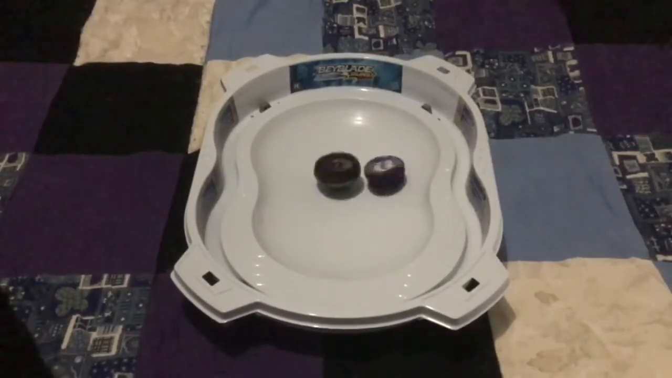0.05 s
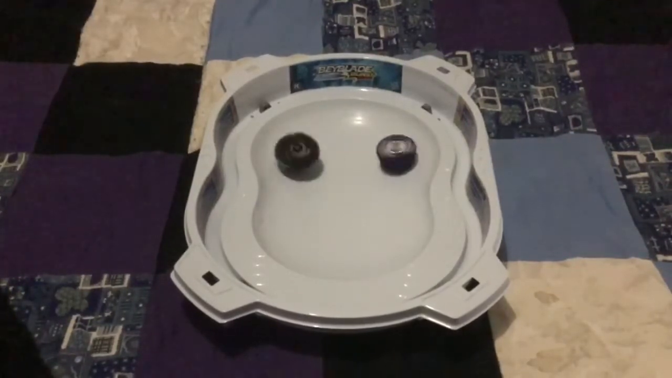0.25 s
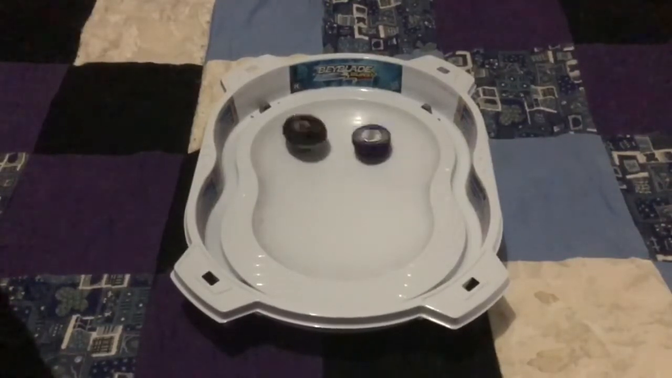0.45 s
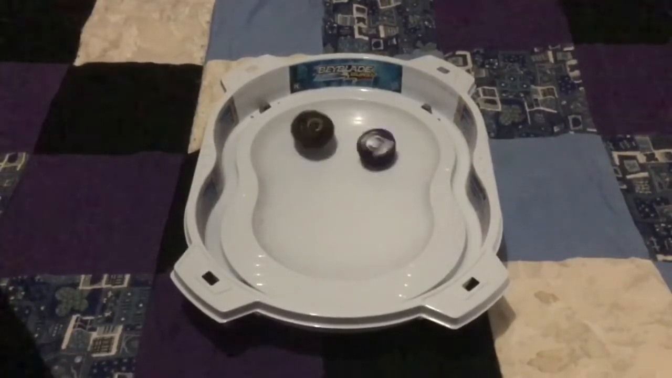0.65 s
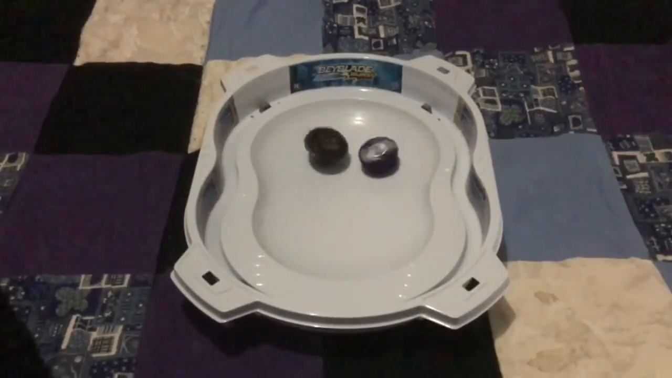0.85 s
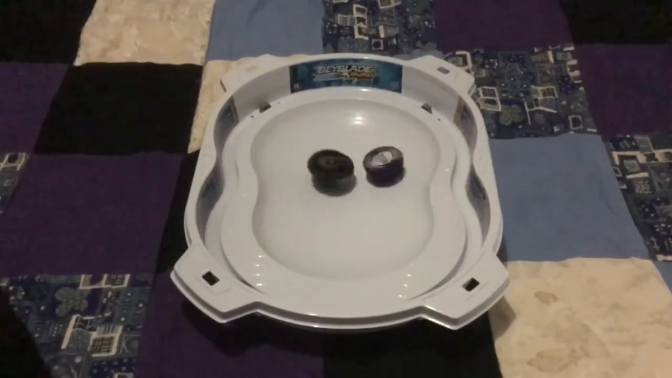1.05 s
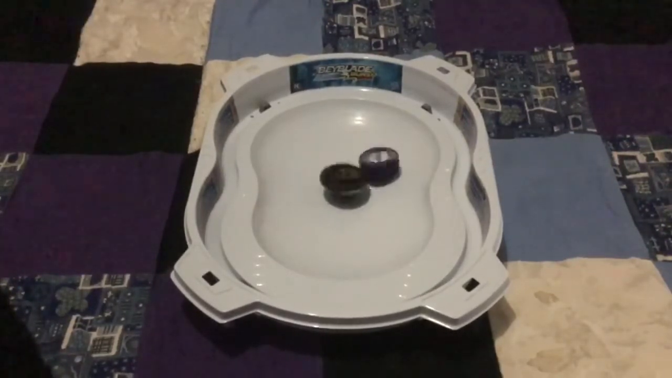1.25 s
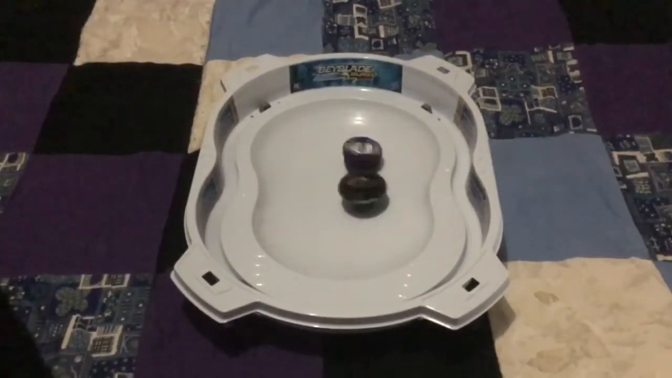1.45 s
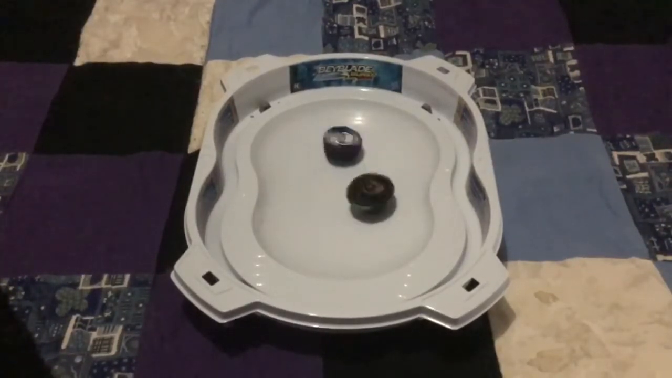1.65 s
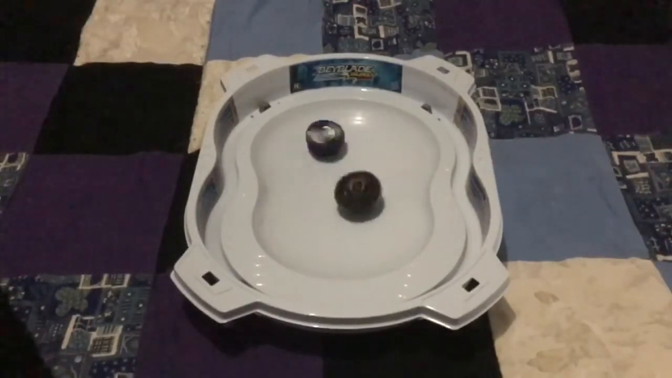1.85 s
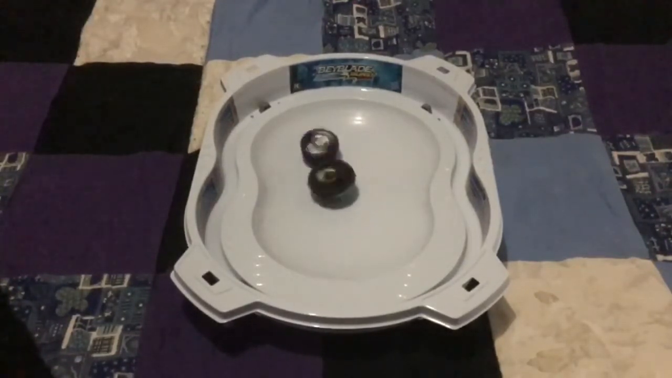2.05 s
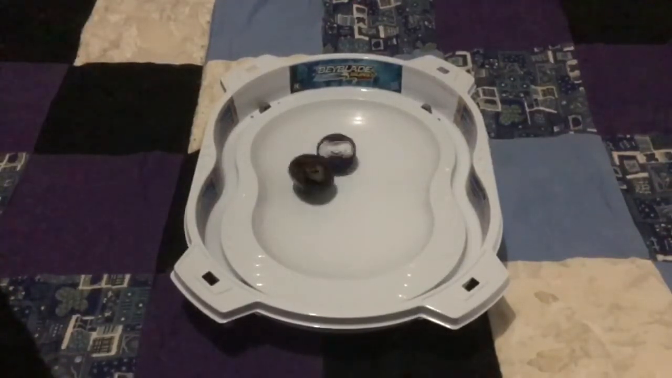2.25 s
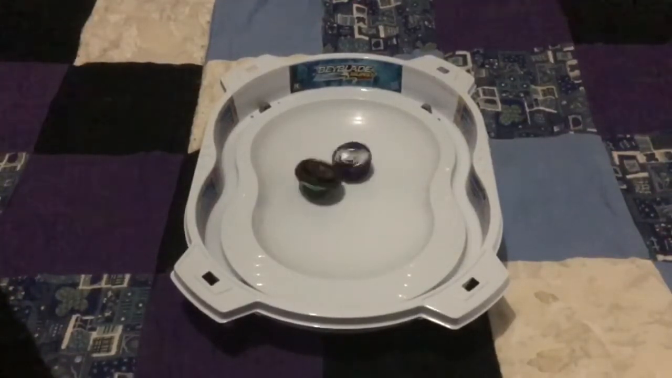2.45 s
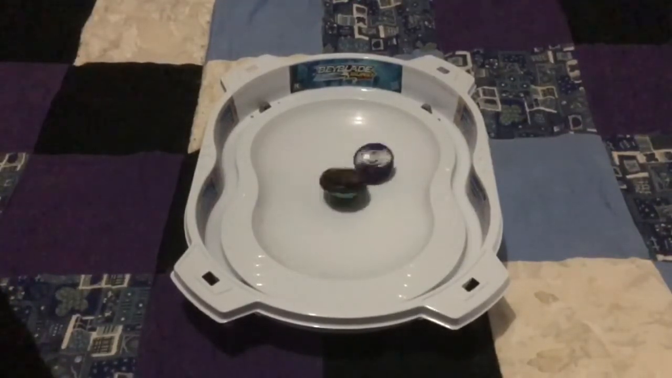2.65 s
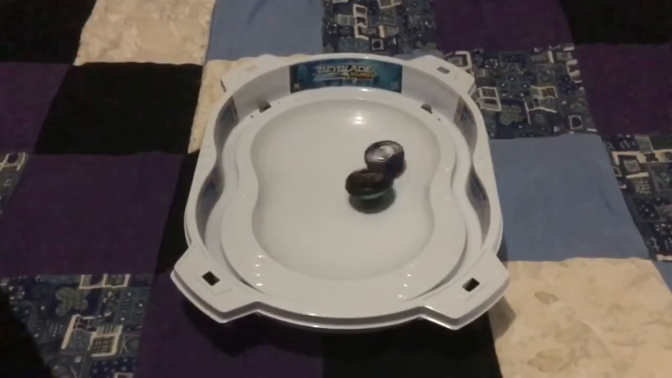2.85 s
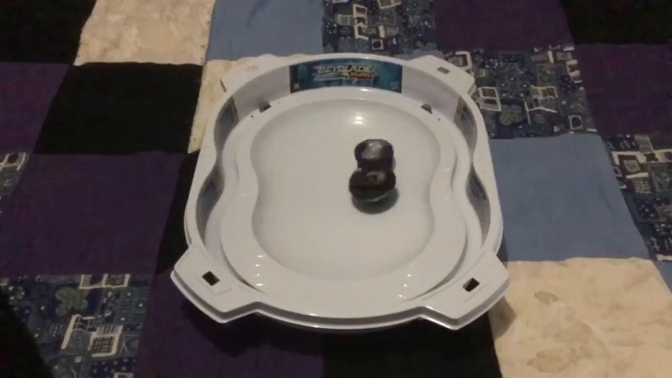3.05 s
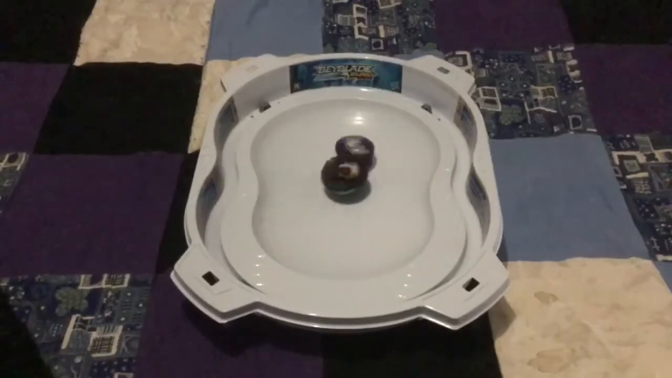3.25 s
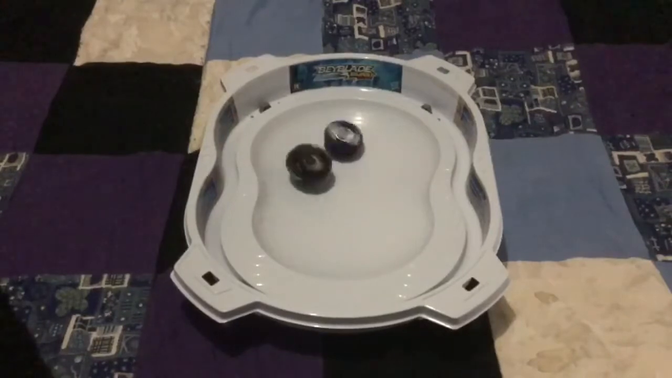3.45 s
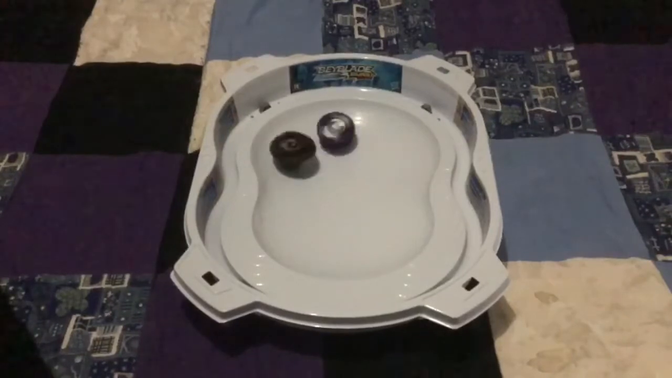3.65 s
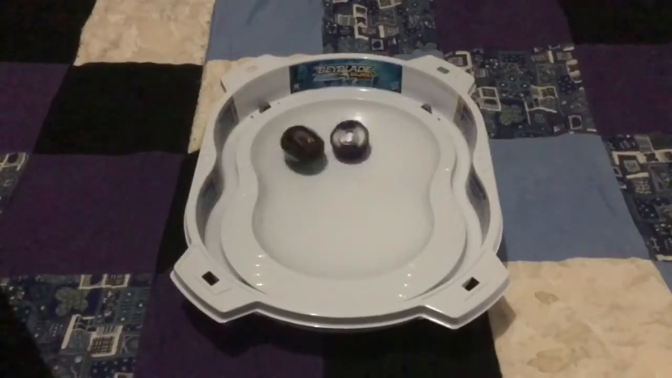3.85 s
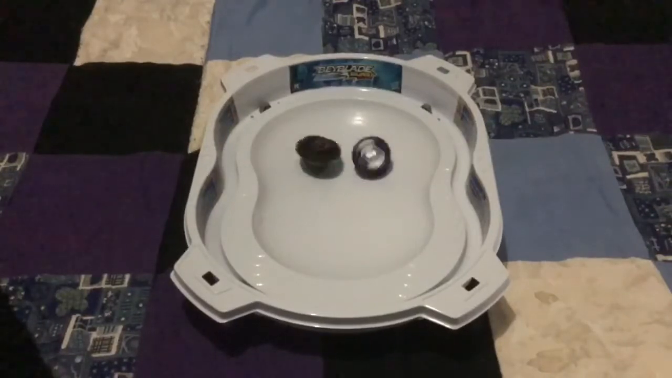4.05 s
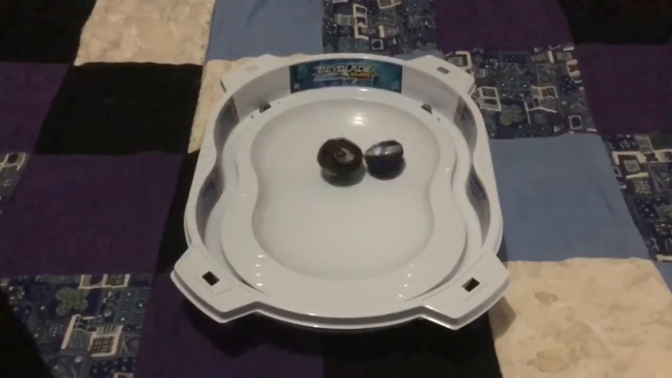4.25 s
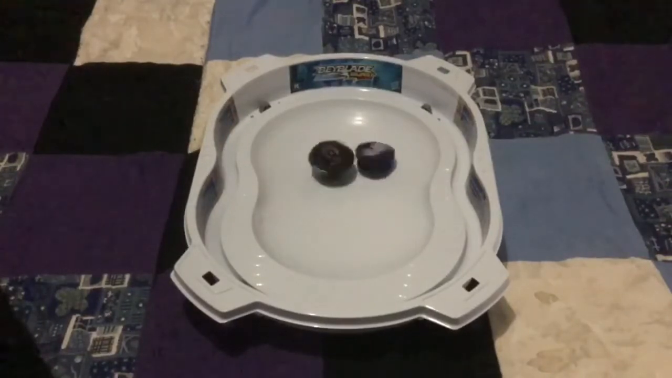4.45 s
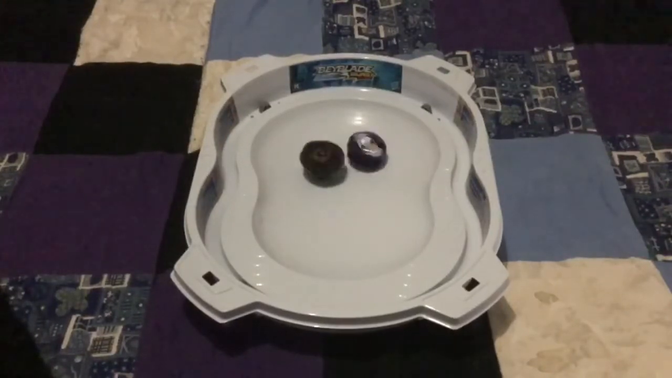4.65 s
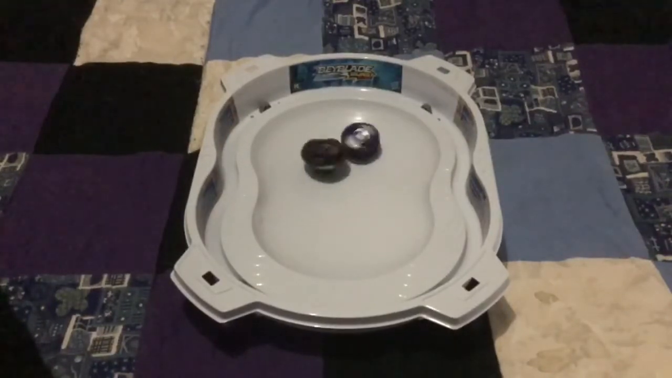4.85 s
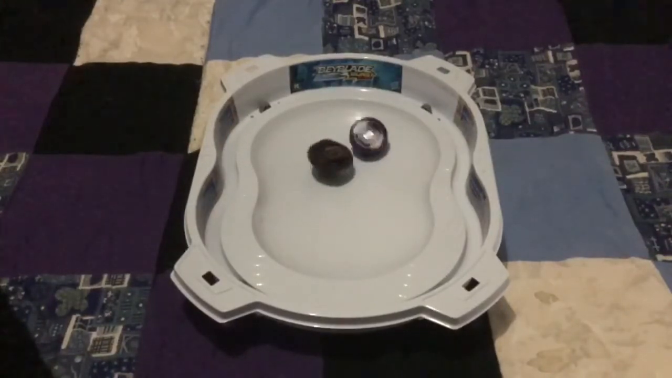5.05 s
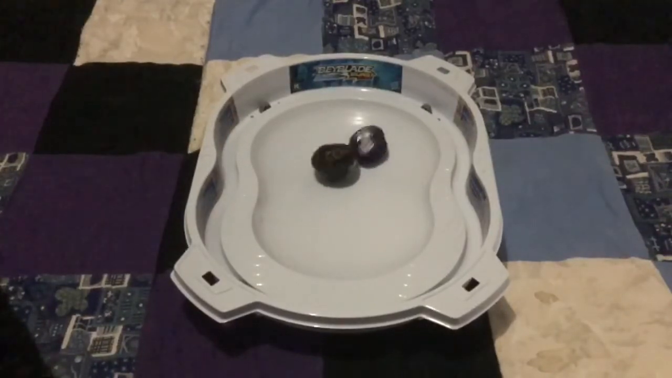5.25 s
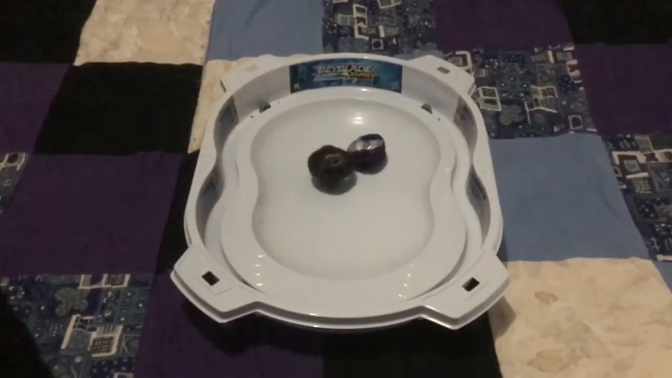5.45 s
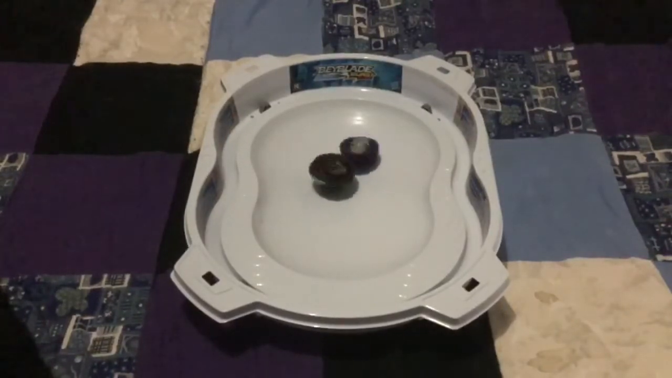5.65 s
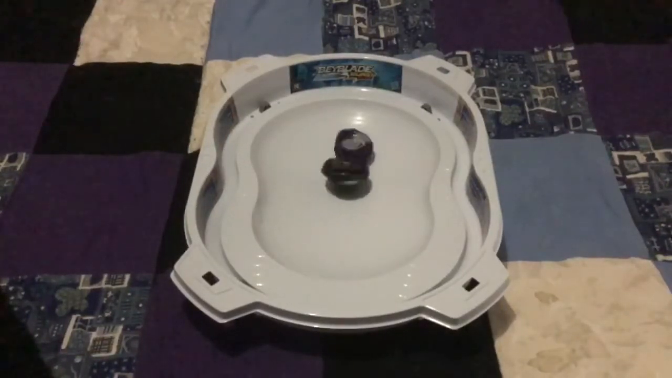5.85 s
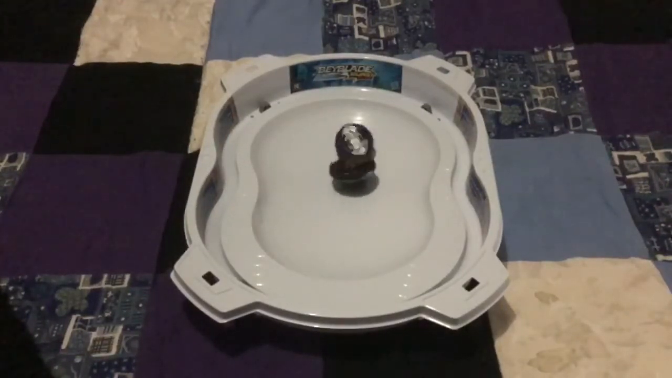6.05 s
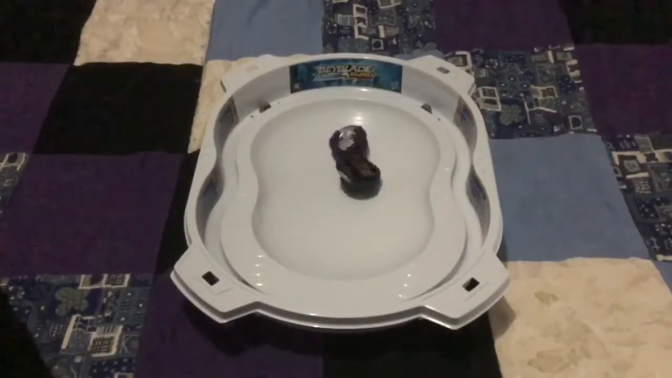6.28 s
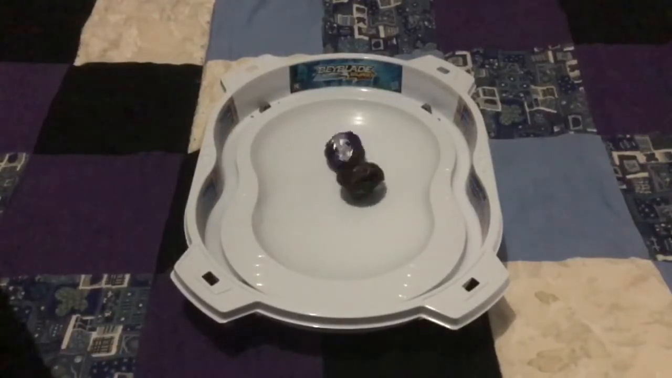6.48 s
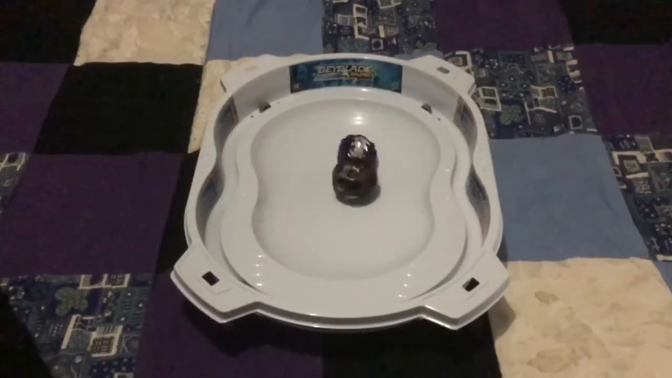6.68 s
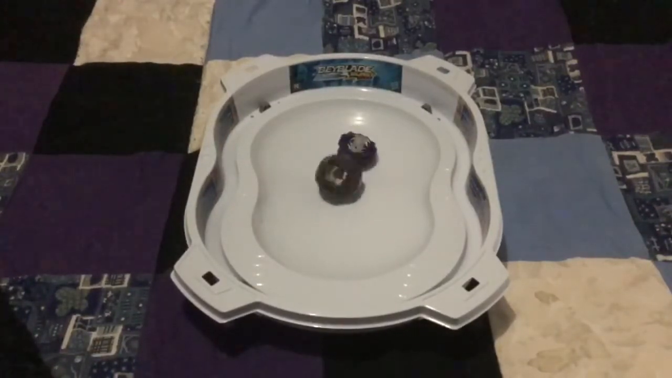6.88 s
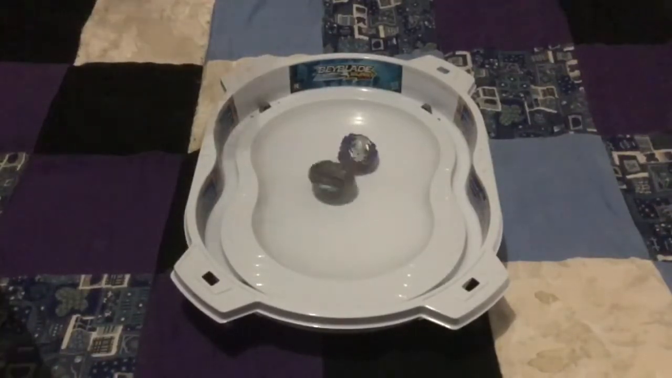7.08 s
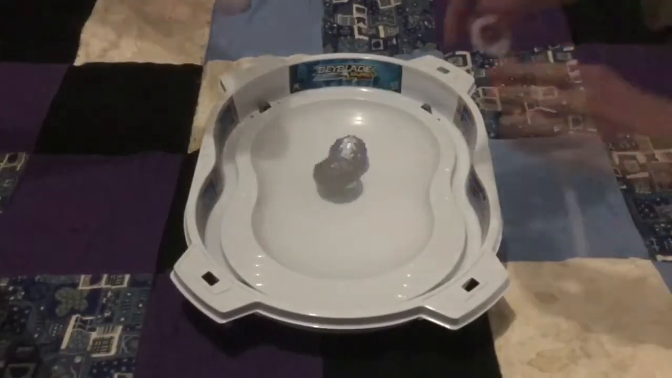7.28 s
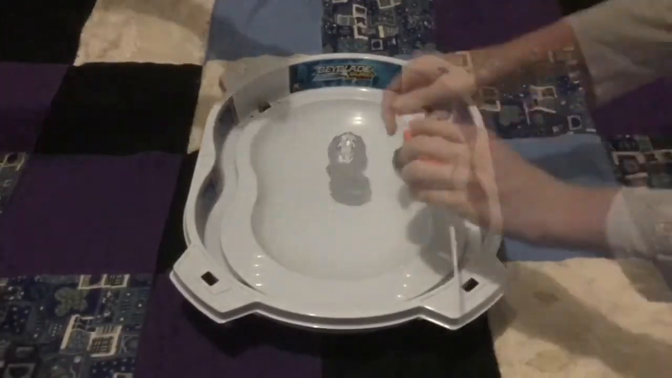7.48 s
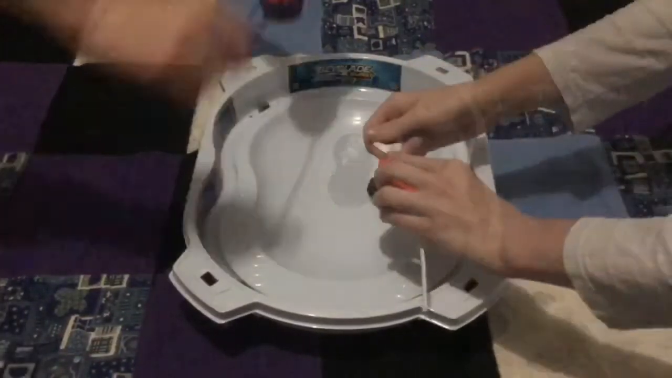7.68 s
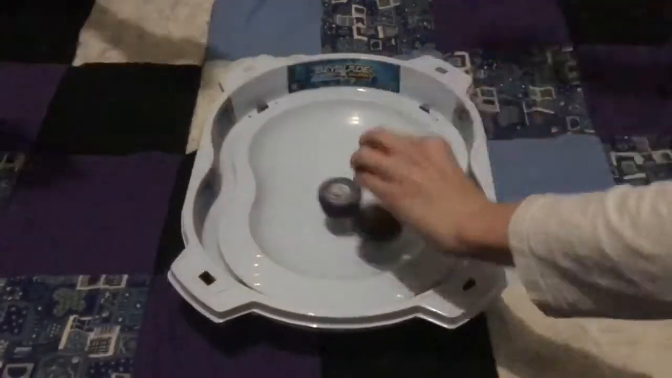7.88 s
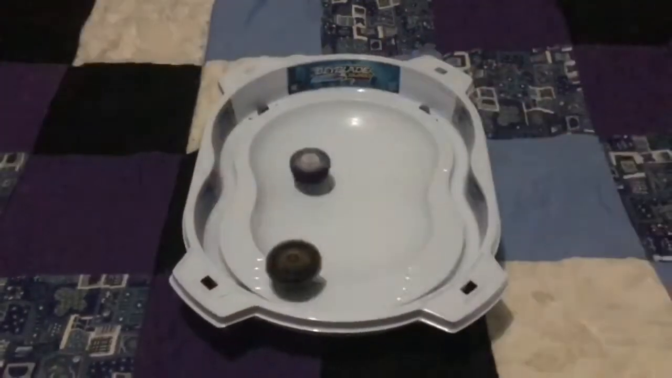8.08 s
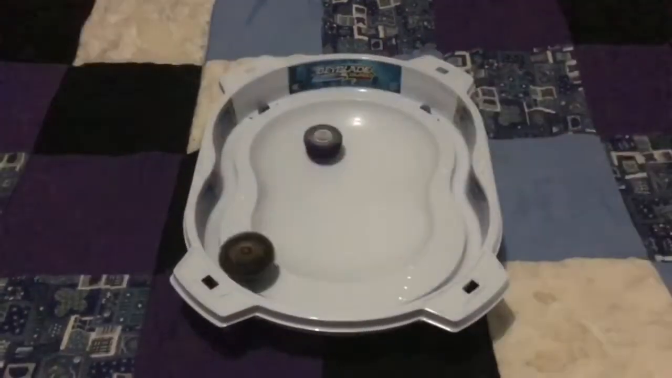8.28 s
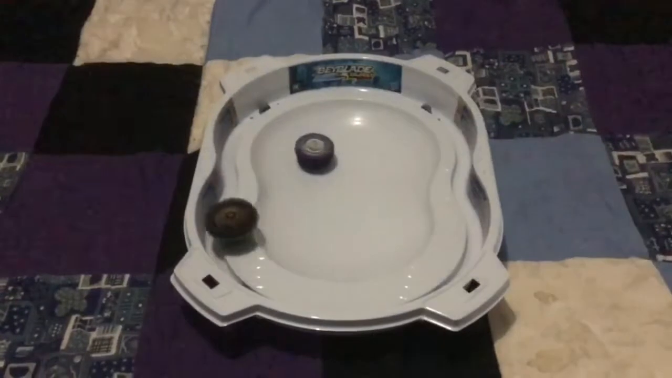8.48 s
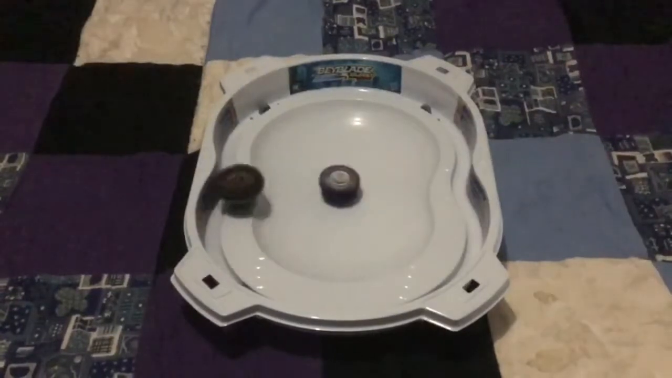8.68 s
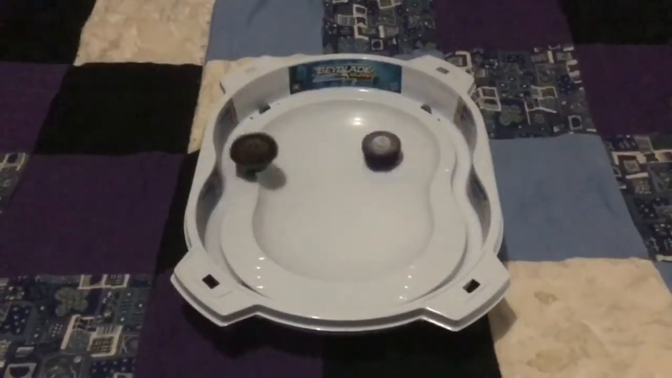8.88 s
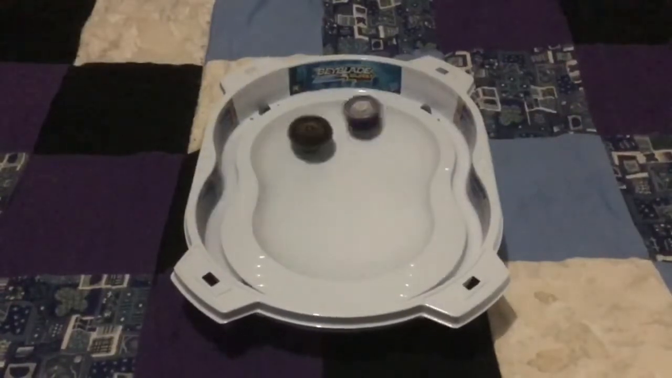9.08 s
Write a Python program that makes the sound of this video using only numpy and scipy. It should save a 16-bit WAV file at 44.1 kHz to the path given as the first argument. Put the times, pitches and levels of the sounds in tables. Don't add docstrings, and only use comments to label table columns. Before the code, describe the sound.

A phone close to a plastic arena picks up spinning tops tapping and brushing rims, their tips rumbling softly beneath a pure low hum. Clicks cluster midway, then thin out. Suddenly two quick ratchet-like cord pulls with squeaking gears release new tops, which bang onto the hollow floor, knock the side wall and end in rough, biting rim scrapes. Short, dry room echo and faint hiss.

```python
import sys
import numpy as np
from scipy import signal
from scipy.fft import rfft, irfft, next_fast_len
from scipy.io import wavfile
from scipy.ndimage import uniform_filter1d, map_coordinates

SR = 44100
rng = np.random.default_rng(int(sys.argv[2]) if len(sys.argv) > 2 else 0)


def makeup_ratio(level_db):
    decades = np.asarray(level_db, float) / 20
    return 10 ** decades


def output_pcm(signal):
    pcm = np.clip(np.atleast_2d(signal).T, -1, 1) * 32767
    wavfile.write(sys.argv[1], SR, np.round(pcm).astype(np.int16))


N = 402191
TIME = np.arange(N) / SR

# pitch_hz, width_hz, level_db
FLOOR_MODES = [(102.8, 17, -0.5), (171.3, 48.4, 3), (215.5, 106.4, -0.5), (296.7, 90, -0.5),
               (423.2, 78, -3.5), (500.4, 110, -5), (637.7, 59, -4.5)]
# pitch_hz, level_db (per Hz)
EDGE_COLOUR = [(4000, -36), (7000, -3), (9000, -3.5), (13000, -5.5), (15500, -4), (17000, -23)]
# pitch_hz, level_db (per Hz)
BRUSH_COLOUR = [(600, -21.5), (1200, -0.5), (2000, 1.5), (3200, -4), (4800, -5.5), (6000, -12), (9000, -23),
                (15000, -28.5)]


def unit(x):
    return x / np.sqrt(np.mean(x ** 2) + 1e-20)


def along(points, hz):
    point_hz, value = np.transpose(points)
    return np.interp(np.log(hz + 1), np.log(point_hz + 1), value)


def level_curve(rows):
    s, db = np.transpose(rows)
    return np.interp(TIME, s, db)


def gated(rows, db):
    since_start = TIME - rows[0][0]
    until_end = rows[-1][0] + 0.022 - TIME
    return makeup_ratio(db) * np.clip(np.minimum(since_start, until_end) / 0.044, 0, 1)


def wobble(rate):
    return map_coordinates(rng.standard_normal(int(N * rate / SR) + 4), [TIME * rate])


def filtered(x, response):
    m = next_fast_len(N + SR // 2)
    return irfft(rfft(x, m) * response(np.fft.rfftfreq(m, 1 / SR)), m)[..., :N]


def coloured(x, spectrum):
    return filtered(x, lambda hz: makeup_ratio(along(spectrum, hz)))


def ringing(x, modes, sign=-1):
    def response(hz):
        total = 0
        for k, (centre, width, db) in enumerate(modes):
            loss = 1j * hz * width
            total = total + sign ** k * makeup_ratio(db) * loss / (centre * centre - hz * hz + loss)
        return total
    return filtered(x, response)


def dying(times, dbs, t60):
    start = np.bincount(np.round(times * SR).astype(int), makeup_ratio(2 * dbs), N)[:N]
    return np.sqrt(signal.lfilter([1], [1, -makeup_ratio(-120 / (t60 * SR))], start))


def pressed_on(rows, rise, fall):
    levels = []
    for s, hold, db in rows:
        before = np.maximum(s - TIME, 0)
        after = np.maximum(TIME - s - hold, 0)
        levels.append(db - rise * before - fall * after)
    return np.max(levels, axis=0)


def grains(rate, spread_db):
    size = makeup_ratio(spread_db * np.clip(rng.standard_normal(N), -2, 2))
    return (rng.random(N) < rate / SR) * size * rng.choice([-1, 1], N)


def rattle(rate, depth):
    skips = signal.lfilter([1], [1, -makeup_ratio(-60 / (.012 * SR))], np.abs(grains(rate, spread_db=4)))
    return unit(1 + depth * unit(skips))


def patchy(depth_db):
    z = signal.stft(rng.standard_normal(N), nperseg=256)[2]
    field = uniform_filter1d(rng.standard_normal(z.shape), size=6, axis=0)
    field = uniform_filter1d(field, size=5, axis=1)
    return unit(signal.istft(z * makeup_ratio(depth_db * unit(field)), nperseg=256)[1][:N])


def brief_notes(rows, t60, rough, slips):
    out = np.zeros(N + SR)
    slip = rough * wobble(slips)
    flutter = makeup_ratio(3 * wobble(300))
    for s, hz, hold, db in rows:
        start = round(s * SR)
        a = slice(start, start + SR // 16)
        t = TIME[a] - s
        fade_in = np.clip(t / .0012, 0, 1)
        shape = makeup_ratio(db - 60 * np.maximum(t - hold, 0) / t60) * fade_in
        out[a][:len(t)] += shape * flutter[a] * np.sin(2 * np.pi * hz * t + slip[a])
    return out[:N]


def hits(rows, click_db, edge_db, chatter_db, shell_db, thump_db):
    # pitch_hz, level_db (per Hz)
    click_colour = [(600, -46.5), (1200, -6.5), (2000, -12), (3600, -1.5), (5600, -1.5), (7000, -15.5),
                    (9000, -39), (16000, -44)]
    # pitch_hz, width_hz, level_db
    shell_modes = [(982, 73, -13), (1140, 49, -3.5), (1234, 170, -9.5), (1855, 120, -5.5), (2423, 380, -11),
                   (3160, 670, -11.5), (4170, 77, -20)]
    s, db, bright, knock, thump = np.transpose(rows)
    noise = patchy(depth_db=1.4)
    loose = rattle(300, 1.2)

    def snap(level, t60, size):
        jump = uniform_filter1d(dying(s, level, t60), size=size)
        return jump + dying(s, level + chatter_db, 0.065) * loose

    click = coloured(snap(db + click_db, 0.014, size=36) * noise, click_colour)
    edge = coloured(snap(db + bright + edge_db, 0.015, size=12) * noise, EDGE_COLOUR)
    shell = ringing(dying(s, db + knock + shell_db, 0.019) * noise, shell_modes)
    floor_db = db + thump + thump_db
    push = dying(s + 0.001513, floor_db, 0.0018)
    shake = 1.92 * dying(s, floor_db, 0.043) * noise
    floor = ringing(push, FLOOR_MODES, sign=0.78) + ringing(shake, FLOOR_MODES)
    return click + edge + shell + floor


def clashes():
    # start_s, level_db (click peak), brightness_db, floor_thump_db (both beside the click)
    clean = [(.478, -13, -8.5, -21), (0.8839, -19.5, -6, -15), (1.2503, -26.5, -12, -15.5),
             (2.08, -23.5, -11.5, -10), (2.0925, -17.5, -9.5, -10.5), (2.4502, -23.5, -10, -14.5),
             (2.525, -25.5, -9, -16), (3.2219, -30, -15, -15.5), (3.276, -23, -15.5, -15),
             (3.697, -23.5, -10, -10.5), (3.8726, -39, -12, 5.5), (4.113, -40, -3, -13),
             (4.1801, -22, -8.5, -11), (4.3783, -38.5, -15.5, -5), (4.4283, -25.5, -14, -19),
             (4.8322, -30.5, -15, -15), (4.8635, -30, -6.5, -12), (4.927, -21.5, -12, -18.5),
             (5.204, -22, -11, -13.5), (5.302, -25, -10, -20), (5.409, -26, -10, -33),
             (5.6872, -25, -10.5, -14), (5.8485, -28, -10.5, -19), (6.115, -27.5, -11, -7),
             (6.145, -26.5, -11, -19)]
    bumps = [(0.024, -17.5, -4.5, -17), (0.474, -22.5, -1, -12), (2.07, -31, -11, -6),
             (2.125, -22, -13, -11.5), (2.428, -32, -9, -19), (3.7086, -30.5, -6, -8),
             (3.7553, -19.5, -5.5, -11.5), (3.8465, -30, -20, -4.5), (3.897, -43, -15, 0),
             (3.915, -39, -13, 1), (3.984, -43, -21, 6), (4.077, -43, -18, 3), (4.0155, -37, -11, -1),
             (4.046, -40, -16, 4.5), (4.1377, -32.5, -7, -6), (4.1582, -35, -1, -5.5),
             (4.177, -27.5, -2, -14), (4.186, -29, -14, -19), (4.408, -41.5, -16, 2),
             (4.4981, -27, -9, -12), (5.1129, -41, -23.5, -2), (5.1791, -46, -21, 8),
             (5.291, -39, -12, 2.5), (5.337, -38, -28, -7), (5.375, -24, -12, -5), (5.755, -40, -23, 1.5),
             (6.1611, -27, -20, -12.5), (6.762, -34, -12, -10.5), (7.2446, -30.5, -17, -13),
             (7.3564, -32.5, -15, -15.5)]
    # start_s, level_db (click peak), floor_thump_db (beside the click)
    knocks = [(3.323, -35.5, -7.5), (3.8233, -31.5, -4.5), (3.9406, -30, -4), (4.4672, -34.5, 3),
              (4.972, -38, 1.5), (5.038, -41.5, 5), (5.1483, -40, 2), (5.627, -43, 8), (5.658, -37.5, -2.5),
              (5.71, -32.5, -2.5), (5.8662, -33.5, -6.5), (5.908, -39, -7), (6.735, -40.5, -9),
              (7.169, -36.5, -10), ]
    rows = [(s, db, bright, -38, thump) for s, db, bright, thump in clean]
    rows += [(s, db, bright, -7.5, thump) for s, db, bright, thump in bumps]
    rows += [(s, db, -15.5, -1, thump) for s, db, thump in knocks]
    return hits(rows, click_db=0.5, edge_db=5.0, chatter_db=-4.5, shell_db=17.5, thump_db=17.0)


def blows():
    # start_s, level_db (click peak), brightness_db, shell_knock_db, floor_thump_db
    blow_rows = [(7.6595, -13, 8, -42, -14.5), (7.7728, -40, -9.5, -17, -15),
                 (7.7861, -11.5, -15, -12.5, -4), (7.864, 1, -4.5, -47, -15.5), (7.9268, -21, -10, 2, -16),
                 (8.0052, -16.5, -12.5, -19, -6), (8.0273, -34, -26, 7.5, 11.5),
                 (8.1038, -30, -7, -9.5, 1.5), (8.1427, -32, -17, -8, 0), (8.1884, -27, -14, -18, -12),
                 (8.2001, -13.5, -12, -7.5, -16), (8.2092, -19.5, -11, 1.5, -11.5),
                 (8.521, -49, -24, -4, -8), (8.5248, -9, -9, -8.5, -14), (8.536, -10, -25.5, -5.5, -11.5),
                 (8.832, -41.5, -37.5, 5, 10), (8.8423, -36, -43, 2, 7.5), (8.8564, -30, -22, -3, 4),
                 (8.8679, -20.5, -34, 7.5, -2.5), (8.8819, -24, -31, -13, 3), (8.9965, -16, -6, -10, -1.5),
                 (9.0144, -29, -24, -22, 9), (9.0224, -1.5, -2.5, -7.5, -18), (9.033, -24, -18, -4, -14),
                 (9.054, -21, -16, -2, -25), (9.066, -20, -20, 1, -25), (9.1063, -11.5, -8, -20, -16.5),
                 (9.1114, -16, -17, -14, -10)]
    return hits(blow_rows, click_db=0.5, edge_db=1.5, chatter_db=-19.0, shell_db=22.5, thump_db=15.0)


def grazes():
    # start_s, level_db (peak)
    single = [(1.377, -48), (3.357, -47), (3.678, -44.5), (3.889, -39), (3.9094, -34), (3.9602, -31.5),
              (3.9784, -32.5), (4.0737, -36), (4.56, -38.5), (5.49, -45), (5.7728, -43), (5.8834, -53),
              (5.9055, -28.5), (5.9853, -39.5), (6.0384, -33), (6.302, -43.5), (6.391, -37), (6.412, -37.5),
              (6.452, -61), (7.19, -40), (8.403, -36.5), (8.493, -34), (8.674, -39), (8.759, -38),
              (8.815, -31.5)]
    # start_s, count, gap_s, level_db
    runs = [
        (1.418, 2, 0.034, -50),
        (1.515, 4, 0.01, -51.5),
        (6.129, 3, 0.015, -33.5),
        (6.504, 3, 0.027, -49.5),
    ]
    faint = [0.376, 0.4156, 1.605, 1.679, 2.387, 3.114, 3.175, 6.4394, 7.15, 7.5319]
    repeated = [(s + k * gap, db) for s, count, gap, db in runs for k in range(round(count))]
    s, db = np.transpose(single + repeated + [(s, -52) for s in faint])
    stroke = uniform_filter1d(dying(s + 0.0018, db - 4.5, 0.089), size=120)
    rub = stroke * rattle(320, 1) * patchy(depth_db=4.5)
    return coloured(rub, BRUSH_COLOUR) + makeup_ratio(17.5) * ringing(rub, FLOOR_MODES[3:])


def rubbing():
    # start_s, hold_s, level_db
    contacts = [(1.375, 0.11, -69.5), (1.515, .11, -68.5), (3.33, 0.12, -68), (3.47, 0.075, -76),
                (3.825, 0.091, -48), (3.94, 0.056, -54), (4.015, 0.056, -52), (4.112, .06, -50.5),
                (4.18, 0.02, -50), (4.4, .12, -56.5), (4.84, .045, -59.5), (4.94, 0.041, -60),
                (5.04, 0.02, -57), (5.15, 0.055, -54), (5.29, 0.092, -49.5), (5.63, 0.17, -53.5),
                (5.85, 0.084, -55), (6.3, 0.031, -63.5), (6.39, 0.047, -75), (6.5, 0.095, -67)]
    # pitch_hz, level_db (per Hz)
    colour = [(700, -26), (1300, -7), (2600, 0), (4000, -4), (5200, -4), (6500, -21), (10000, -18),
              (15000, -34)]
    stream = rattle(520, 2.2) * patchy(depth_db=3)
    return makeup_ratio(pressed_on(contacts, rise=2500, fall=730)) * unit(coloured(stream, colour))


def brushing_ticks():
    # start_s, pitch_hz, level_db
    lobe_ticks = [(1.38, 4000, -59), (1.392, 4230, -58), (1.418, 3480, -53), (1.431, 3520, -52),
                  (1.468, 2800, -56.5), (1.484, 1820, -65.5), (1.517, 4400, -50), (1.523, 4500, -51),
                  (1.532, 4770, -52.5), (1.543, 4550, -50), (1.546, 1780, -56), (1.557, 4200, -57),
                  (1.567, 5200, -51), (1.572, 1910, -57), (1.619, 4480, -59.5), (3.36, 4520, -43),
                  (3.391, 5200, -62), (3.408, 5150, -57), (3.423, 4970, -59), (3.444, 5040, -59),
                  (3.456, 5200, -61), (3.481, 2770, -59), (6.302, 3440, -51), (6.313, 2500, -55),
                  (6.389, 4000, -58), (6.393, 1900, -43.5), (6.405, 3500, -55), (6.412, 4900, -55),
                  (6.417, 2540, -51), (6.432, 3000, -51), (6.455, 2150, -52), (6.466, 2080, -58),
                  (6.537, 4000, -56.5), (6.567, 3000, -47)]
    s, hz, db = np.transpose(lobe_ticks)
    click = coloured(dying(s, db + 6.0, 0.0082) * rng.standard_normal(N), BRUSH_COLOUR)
    rows = [(s, hz, .001, db) for s, hz, db in lobe_ticks]
    return click + brief_notes(rows, t60=.018, rough=1.4, slips=1700)


def pings():
    # start_s, pitch_hz, level_db
    parts = [(3.825, 1830, -30.5), (3.848, 2370, -37), (3.872, 2880, -32), (3.888, 4200, -47),
             (3.914, 2500, -47), (3.992, 2880, -40), (4.019, 2470, -39), (4.047, 2800, -29.5),
             (4.077, 2010, -45), (4.12, 4070, -41), (4.139, 4840, -40), (4.185, 4000, -35),
             (4.195, 5170, -32), (4.469, 604, -41), (4.968, 1930, -38), (5.041, 1870, -35),
             (5.149, 1850, -40), (5.206, 1180, -35), (5.304, 1900, -42), (5.339, 2660, -39),
             (5.378, 1830, -43), (5.41, 4100, -34)]
    rows = [(s, hz, .001, db) for s, hz, db in parts]
    return brief_notes(rows, t60=.018, rough=1.3, slips=1300)


def rings():
    # (start_s, level_db)
    tones = [
        (6420, 0.61, [(.03, -67), (.48, -55.5), (2.1, -61), (4.181, -69), (5.49, -75)]),
        (12550, 0.31, [(1.54, -73.5), (3.28, -57), (3.7, -60), (3.83, -57), (4.015, -56), (4.43, -55), (4.93, -64), (5.045, -69), (5.38, -66), (5.66, -63), (5.9, -76), (6.145, -64), (6.4, -74)]),
        (11650, 0.304, [(1.52, -75), (3.3, -61), (4.015, -56), (5.66, -65), (5.92, -78)]),
        (7800, 0.39, [(2.1, -57)]),
        (4000, 0.29, [(5.04, -56)]),
    ]
    out = np.zeros(N)
    flutter = makeup_ratio(2.8 * wobble(90))
    drift = 1.2 * wobble(80)
    for hz, t60, strikes in tones:
        for s, db in strikes:
            start = round(s * SR)
            a = slice(start, start + SR // 2)
            t = TIME[a] - s
            out[a] += makeup_ratio(db - 60 * t / t60) * flutter[a] * np.sin(2 * np.pi * hz * t + drift[a])
    return out


def hum():
    # time_s, level_db
    steady = [(1.3, -76), (1.49, -61.5), (2.28, -58), (2.58, -50.5), (3.12, -56.5), (3.41, -53),
              (4.34, -40.5), (5.46, -37), (6.03, -48), (6.1, -43), (6.75, -44), (6.82, -71)]
    # peak_s, pitch_hz, level_db, rise_db_per_s, fall_db_per_s
    swells = [
        (0.0, 105, -61, 99, 126),
        (.46, 107.3, -44.5, 66.5, 403),
        (1.439, 158.8, -44, 133, 87.5),
        (2.05, 99, -54, 157.5, 198.5),
        (3.998, 153.7, -37, 105.5, 320),
        (6.951, 87, -40.5, 129.5, 285),
        (7.2, 90.3, -50, 145, 403),
        (7.89, 150, -29, 310, 151),
        (8.922, 104, -32, 72, 240),
    ]
    spin_hz = 99.6 - 1.8 * np.maximum(TIME - 3.05, 0)
    turning = np.sin(2 * np.pi * np.cumsum(spin_hz) / SR)
    out = gated(steady, level_curve(steady) + 0.35 * wobble(13.0)) * turning
    for s, hz, db, rise, fall in swells:
        out += makeup_ratio(pressed_on([(s, 0, db)], rise, fall)) * np.sin(2 * np.pi * hz * TIME)
    return np.sqrt(2) * out


def rolling():
    # time_s, level_db (rumble)
    first_round = [(0.0, -45), (.19, -50.5), (1.26, -56), (1.45, -49), (1.85, -55), (3.74, -52.5),
                   (3.86, -43.5), (4.06, -46.5), (4.18, -50), (4.87, -50), (5.02, -47.5), (5.29, -44),
                   (5.46, -54), (5.7, -47.5), (6.2, -44.5), (6.6, -49.5), (6.94, -52), (7.61, -54.5)]
    # time_s, level_db (rumble)
    second_round = [
        (7.85, -45),
        (8.001, -39.5),
        (8.25, -32),
        (8.59, -44.5),
        (8.84, -40),
    ]
    # rumble_db, scratch_db
    scratch_law = [(-52.5, -76.5), (-47, -69.5), (-44.5, -61.5), (-31.5, -56)]
    # pitch_hz, level_db (per Hz)
    rumble_colour = [(20, -52), (35, -15), (70, 0), (100, 5), (160, -6), (300, -21), (650, -36), (800, -28),
                     (1500, -82.5)]
    scratch_colour = [(400, -28), (700, -10.5), (1000, 4.5), (1850, 4), (3300, 0), (4800, -2),
                      (8500, -12.5), (13000, -23), (16000, -14)]
    rumble_db = level_curve(first_round + second_round)
    scratch_db = np.interp(rumble_db, *np.transpose(scratch_law))
    drive = rng.standard_normal(N) * makeup_ratio(1.5 * wobble(25))
    through_floor = ringing(ringing(drive, FLOOR_MODES), FLOOR_MODES)
    rumble = unit(unit(coloured(drive, rumble_colour)) + 0.4 * unit(through_floor))
    pressed = np.clip((scratch_db + 63) / 12, 0, 1)
    scratch = coloured(patchy(depth_db=1.5) * rattle(330, 1.1 * pressed), scratch_colour)
    return makeup_ratio(rumble_db) * rumble + makeup_ratio(scratch_db) * unit(scratch)


def launchers():
    # start_s, hold_s, level_db
    draws = [
        (7.568, 0.04, -46),
        (7.603, .05, -35.5),
        (7.76, .05, -34.5),
    ]
    # start_s, hold_s, level_db
    jerks = [
        (7.636, 0.017, -28),
        (7.66, 0.019, -20),
        (7.813, 0.0051, -17),
    ]
    # pitch_hz, width_hz, level_db
    case_modes = [(2900, 650, -3), (4230, 420, -0.5), (5190, 420, 2.5), (7160, 1200, -0.5),
                  (10070, 6000, -5.5), (14100, 4700, -9.5)]
    teeth = unit(grains(2500, spread_db=4)) + .7 * patchy(depth_db=6)
    uneven = makeup_ratio(1.2 * wobble(150))
    draw_db = pressed_on(draws, rise=2200, fall=410)
    jerk_db = pressed_on(jerks, rise=3200, fall=410)
    return makeup_ratio(np.maximum(draw_db, jerk_db)) * unit(ringing(teeth * uneven, case_modes))


def gear_squeaks():
    # start_s, pitch_hz, hold_s, level_db
    whistles = [(7.568, 5500, 0.013, -54), (7.582, 5290, 0.017, -35), (7.634, 5110, 0.0086, -30),
                (7.634, 8030, 0.012, -32), (7.66, 7570, 0.013, -19), (7.662, 6050, 0.0075, -19),
                (7.672, 4240, 0.024, -25), (7.69, 5446, 0.0063, -26.5), (7.748, 5150, 0.0037, -32.5),
                (7.766, 4770, 0.0082, -29.5), (7.812, 3010, 0.023, -23.5), (7.813, 6900, 0.013, -29.5),
                (7.815, 4310, 0.012, -23.5), (7.846, 6800, 0.0063, -28), (7.89, 5830, .008, -40.5)]
    return brief_notes(whistles, t60=0.023, rough=0.75, slips=900)


def wall():
    # start_s, level_db
    wall_blows = [(7.927, -33), (7.937, -29), (8.032, -27), (8.201, -30), (8.205, -26), (8.226, -36),
                  (8.247, -32), (8.539, -23), (8.558, -21), (8.576, -27), (8.494, -44), (8.833, -25.5)]
    # pitch_hz, width_hz, level_db
    wall_modes = [(1064, 27, 1), (1280, 134, -1), (665, 44, -9)]
    s, db = np.transpose(wall_blows)
    return ringing(dying(s, db + 23.0, 0.0011), wall_modes)


def scrape():
    # start_s, hold_s, level_db
    presses = [
        (8.875, 0.0043, -42),
        (8.911, 0.031, -15),
        (8.94, 0.034, -14.5),
        (8.989, .004, -8.5),
        (8.996, 0.004, -11.5),
        (9.015, 0.0037, -17),
        (9.034, 0.0012, -6),
        (9.055, 0.0033, -13),
        (9.064, 0.003, -7.5),
        (9.109, .02, -9.5),
    ]
    # pitch_hz, width_hz, level_db
    rim_modes = [(330, 120, -2), (622, 41, 7.5), (960, 89, -5), (1250, 270, -5), (1870, 450, -11),
                 (2970, 860, -8), (4140, 2300, -14)]
    rate = np.clip(339 - 260 * (TIME - presses[0][0]), 0, 339)
    turns = np.floor(np.cumsum(rate * (1 + .08 * wobble(250))) / SR)
    lobes = np.diff(turns, prepend=0) * makeup_ratio(1.8 * rng.standard_normal(N))
    grit = signal.lfilter([1], [1, -makeup_ratio(-60 / (.016 * SR))], lobes) * patchy(depth_db=5)
    buzz = unit(ringing(lobes, rim_modes[:5]))
    buzz = buzz + .75 * unit(ringing(grit, rim_modes[2:]))
    buzz = buzz + .1 * unit(coloured(grit, EDGE_COLOUR))
    return makeup_ratio(pressed_on(presses, rise=5200, fall=1900) - 9.5) * buzz


def arena_tones():
    # start_s, pitch_hz, hold_s, level_db
    brief_tones = [(7.787, 610, 0.032, -28), (7.892, 466, 0.024, -26), (8.202, 1265, 0.0057, -20),
                   (8.209, 1260, 0.011, -17), (8.205, 655, 0.027, -33.5), (8.877, 624, 0.014, -21.5),
                   (8.908, 627.8, 0.039, -25), (8.92, 925, 0.026, -39), (9.048, 615, 0.03, -28.5),
                   (8.915, 3980, 0.0072, -35), (8.941, 2186, 0.015, -28), (8.952, 1860, .022, -25),
                   (8.974, 642, 0.019, -24), (8.988, 1863, 0.011, -22), (8.995, 3070, .007, -19),
                   (9.0, 616, 0.031, -25), (9.013, 1870, 0.0056, -25), (9.0325, 2940, 0.0027, -11.5),
                   (9.054, 3160, 0.013, -19.5), (9.063, 2640, 0.0035, -27), (9.072, 613, 0.011, -28),
                   (9.107, 3060, 0.0078, -19.5), (9.107, 4140, 0.008, -21.5), (9.108, 1715, 0.0058, -18.5)]
    return brief_notes(brief_tones, t60=.018, rough=.5, slips=450)


def thuds():
    # start_s, level_db
    jolts = [(0.032, -38.5), (0.483, -24), (0.888, -31), (3.76, -40), (7.799, -25.5), (7.886, -41),
             (7.929, -21.5), (2.083, -30), (7.665, -26), (7.788, -17.5), (7.864, -17.5), (8.105, -21),
             (9.024, -10)]
    s, db = np.transpose(jolts)
    return ringing(dying(s, db + 18.5, 0.0059), [(107, 74, 0.03)])


def room(x):
    # pitch_hz, t60_s
    decay = [(150, 0.22), (700, 0.22), (4800, 0.19), (13000, 0.15)]
    # pitch_hz, level_db
    reaching_walls = [(200, -1.5), (600, 1), (1500, 1.5), (5000, -1)]
    x = coloured(x, reaching_walls)
    out, step = np.zeros(N + 2 * SR), SR // 3
    for a in range(0, N, step):
        hz, t, z = signal.stft(rng.standard_normal(SR // 3), SR, nperseg=256)
        fading = makeup_ratio(-60 * t / along(decay, hz)[:, None])
        tail = signal.istft(z * fading, SR, nperseg=256)[1]
        wet = signal.fftconvolve(x[a:a + step], tail / np.linalg.norm(tail))
        out[a + 250:][:len(wet)] += wet
    return out[:N]


def microphone_hiss():
    # pitch_hz, level_db (per Hz)
    hiss_colour = [(300, -5), (1000, 7), (5000, -15.5), (10000, -10.5), (14000, -19), (15000, -28.5)]
    return makeup_ratio(-77.5) * unit(coloured(rng.standard_normal(N), hiss_colour))


def scene():
    broad = clashes() + blows() + grazes() + launchers() + rubbing()
    pitched = wall() + scrape() + brushing_ticks() + pings() + gear_squeaks() + arena_tones()
    echo = room(broad + makeup_ratio(-8) * pitched)
    low = thuds() + hum() + rolling()
    return (broad + pitched + makeup_ratio(-4.5) * echo + rings() + low + microphone_hiss())[None]


def roll_off(x):
    return signal.sosfilt(signal.butter(12, 17000, fs=SR, output="sos"), x)


def record(dry):
    x = filtered(dry, lambda hz: (1j * hz / (45 + 1j * hz)) ** 3)
    x = x / (1 + np.abs(x / .9) ** 4) ** (1 / 4)
    x = filtered(x, lambda hz: .9 / (1 + (hz / 15950) ** 90) + .1)
    return roll_off(x)


dry = scene()
out = record(dry)
output_pcm(out)
```